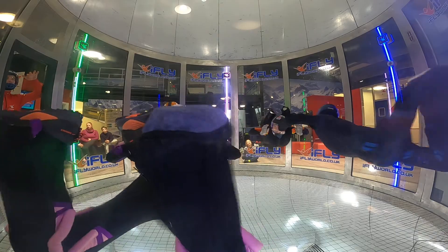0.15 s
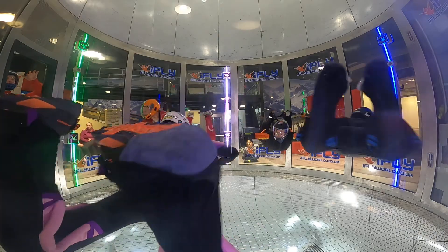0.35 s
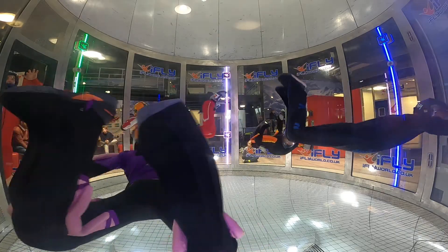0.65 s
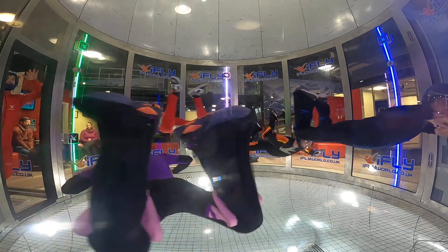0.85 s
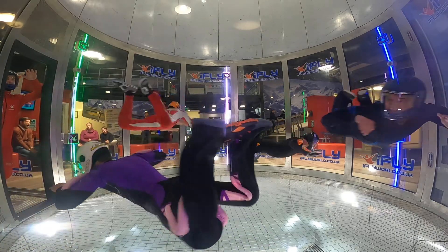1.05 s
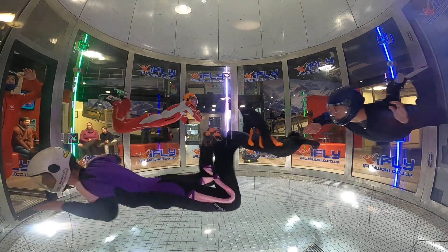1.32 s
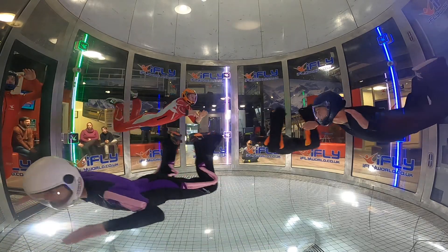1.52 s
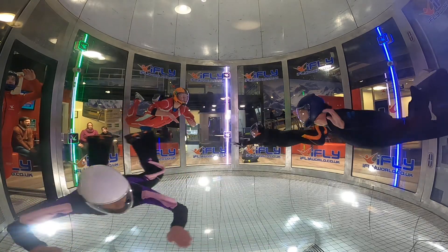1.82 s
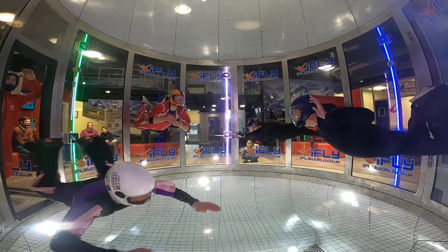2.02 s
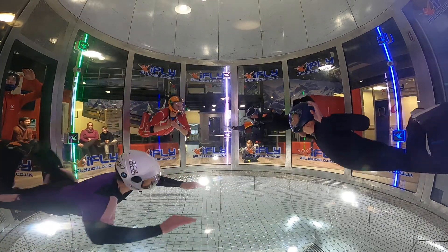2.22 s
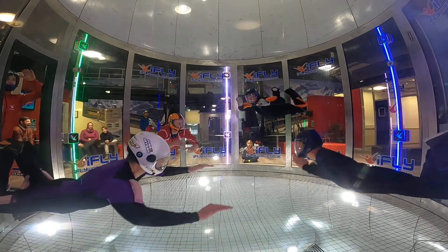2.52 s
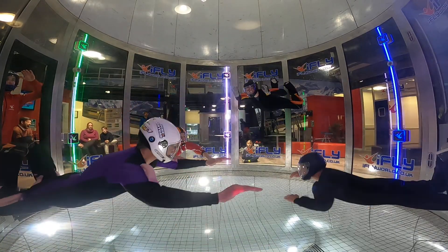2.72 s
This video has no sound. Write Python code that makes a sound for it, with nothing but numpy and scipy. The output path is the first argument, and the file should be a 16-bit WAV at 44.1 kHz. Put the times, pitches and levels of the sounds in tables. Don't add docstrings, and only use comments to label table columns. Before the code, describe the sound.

Steady rushing wind fills a round flight chamber from start to end, with bassy fan hum, unsteady low swells and hissy mesh whistle; near the end the fan tone briefly dips and returns, heard by a small onboard camera.

```python
import sys
import numpy as np
from scipy import signal
from scipy.fft import rfft, irfft, next_fast_len
from scipy.io import wavfile
from scipy.ndimage import uniform_filter1d, map_coordinates

SR = 44100
rng = np.random.default_rng(int(sys.argv[2]) if len(sys.argv) > 2 else 0)


def store_pcm(level_fs):
    pcm = np.round(np.clip(level_fs, -1, 1) * 32767).astype(np.int16)
    wavfile.write(sys.argv[1], SR, np.atleast_2d(pcm).T)


def ratio(d):
    e = np.asarray(d, float) / 20
    return 10 ** e


N = 126126

# (time [s], blade rate [Hz], level [dB])
FAN_TRACK = [(0, 38.3, -15.5), (.15, 38.24, -13), (.4, 38.32, -17.5), (.55, 38.19, -14.5), (.8, 39.02, -17),
             (.95, 38.71, -18.5), (1.1, 38.82, -14.5), (1.3, 38.23, -15.5), (1.8, 38.1, -16.5),
             (2, 38.11, -18), (2.3, 37.77, -15), (2.5, 37.67, -22), (2.72, 39, -34), (2.86, 38.53, -15)]
# (multiple [-], level re blade tone [dB])
FAN_ORDERS = [(3, -20.5), (6, -22), (9, -32.5), (12, -24.5)]
# (centre [Hz], width [Hz], level [dB])
CHAMBER_MODES = [(21, 15, 3.5), (64, 6.4, 4.5), (86, 8.8, 2.5), (114, 10, -8), (126.6, 12, 0.5),
                 (153.2, 19, 1.5), (188, 29, -3), (234.3, 20, -5), (253, 24, -4), (324, 34, -10)]
# (time [s], strength [dB])
STIR_TRACK = [
    (0, -20),
    (.5, -20.3),
    (1, -20),
    (1.6, -20.4),
    (2.2, -19.8),
    (2.42, -19.3),
    (2.55, -17.8),
    (2.68, -19),
    (2.86, -19.5),
]
# (frequency [Hz], density [dB per Hz])
ROAR_SPECTRUM = [(150, -21), (280, -1), (600, -2.5), (850, -6), (1500, -6.5), (2800, -6), (4200, -26.5),
                 (7000, -60)]
# (frequency [Hz], density [dB per Hz])
HISS_SPECTRUM = [(3000, -22.5), (4500, 1), (5500, -0.5), (6000, -7), (7500, -6), (8200, -11.5),
                 (10000, -19), (15500, -20.5)]
# (centre [Hz], width [Hz], level [dB])
VANE_MODES = [(943, 31, -0.5), (1037, 360, -2), (1111, 27, 5)]
# (shedding centre [Hz], width [Hz], level [dB])
MESH_MODES = [(3212, 360, -4.5), (3504, 303, -0.5), (3698, 160, -3)]
# (time [s], level [dB])
MESH_TRACK = [
    (0, -20.5),
    (1.9, -21.5),
    (2.86, -23),
]
# (frequency [Hz], left-right likeness [-])
PORT_LIKENESS = [(60, 1), (250, 0.99), (700, 0.98), (1000, .93), (1500, 0.6), (2200, 0.82), (3200, 0.43),
                 (6000, 0.22)]
# (frequency [Hz], left over right [dB])
PORT_BALANCE_DB = [(100, .35), (250, 1.2), (600, 4), (1000, 3.3), (2000, 1.5), (3200, 4.2), (4100, -1.5),
                   (6000, -3.5)]
# (frequency [Hz], left lead [rad])
PORT_LEAD_RAD = [(100, 0), (780, -0.35), (1200, -0.43), (1980, 0.11), (2840, -.6), (3200, -0.66), (4740, 2)]
# (frequency [Hz], density [dB per Hz])
PORT_WIND_SPECTRUM = [(10, 8), (60, 12.5), (120, -13), (300, -29.5)]
# (middle [s], length [s], frequency [Hz], peak [dB])
WAKE_SURGES = [(0.358, 0.55, 150, -28.5), (0.987, .25, 148, -22.5), (1.399, 0.24, 86, -26),
               (1.62, .09, 158, -21.5), (1.645, 0.72, 65.8, -20.5), (1.901, 0.38, 86, -30.5),
               (1.996, .12, 125.7, -22.5), (2.149, 0.33, 159.7, -23.5), (2.368, 0.44, 62.48, -20),
               (2.618, 0.36, 177.7, -23), (2.731, 0.46, 64, -33), (2.778, 0.089, 145, -14),
               (2.704, .25, 239.5, -27.5)]
# (frequency [Hz], gain [dB])
HOUSING_GAIN = [(5000, 0), (7500, -0.5), (9000, -9), (12000, -16), (15500, -23.5)]


def unit(x):
    return x / np.sqrt(np.mean(x ** 2) + 1e-20)


def along(points, hz):
    point_hz, value = np.transpose(points)
    return np.interp(np.log(hz + 1), np.log(point_hz + 1), value)


def curves(rows):
    time_s, *columns = np.transpose(rows)
    return [np.interp(np.arange(N) / SR, time_s, column) for column in columns]


def wobble(rate_hz):
    knots = rng.standard_normal(int(N * rate_hz / SR) + 4)
    return map_coordinates(knots, [np.arange(N) * rate_hz / SR])


def filtered(x, response):
    size = next_fast_len(N + 8192)
    spectrum = rfft(x, size) * response(np.fft.rfftfreq(size, 1 / SR))
    return irfft(spectrum, size)[..., :N]


def resonant(modes, steep):
    def gain(f):
        power = 0
        for centre_hz, width_hz, db in modes:
            bandpass = np.abs(f * width_hz / (centre_hz ** 2 - f * f + 1j * f * width_hz))
            power = power + ratio(2 * db) * bandpass ** (2 * steep)
        return np.sqrt(power)
    return gain


def shaped(points):
    return lambda f: ratio(along(points, f))


def ports(f):
    angle = np.arccos(np.clip(along(PORT_LIKENESS, f), -1, 1)) / 2
    side = np.array([[1], [-1]])
    level = ratio(side * along(PORT_BALANCE_DB, f) / 2)
    gain = level * np.exp(0.5j * side * along(PORT_LEAD_RAD, f))
    return gain * np.cos(angle), gain * side * np.sin(angle)


def at_ports(x):
    return filtered(x, lambda f: ports(f)[0])


def rush(colour, patchy_db):
    noise = signal.stft(rng.standard_normal((2, N + 512)), nperseg=512)[2]
    patches = rng.standard_normal(noise.shape[1:])
    patches = uniform_filter1d(uniform_filter1d(patches, 6, 0), 14, 1)
    patchy = noise * ratio(patchy_db * unit(patches))
    same, other = signal.istft(patchy, nperseg=512)[1][:, :N]
    shared = filtered(same, lambda f: colour(f) * ports(f)[0])
    differing = filtered(other, lambda f: colour(f) * ports(f)[1])
    return unit(shared + differing)


def port_buffet():
    lumps = ratio(3.5 * np.array([wobble(11), wobble(3.5)]))
    wind = filtered(rng.standard_normal((2, N)), shaped(PORT_WIND_SPECTRUM))
    return ratio(-39.5) * unit(lumps * wind)


def mesh_whistle():
    level_db, = curves(MESH_TRACK)
    whistle = rush(resonant(MESH_MODES, steep=1.64), patchy_db=0.3)
    return ratio(level_db + 2 + 0.45 * wobble(13)) * whistle


def wake_surges():
    t = np.arange(N) / SR
    flutter_db, drift_rad = 0.2, 0.76
    rings = np.zeros(N)
    for mid_s, length_s, hz, peak_db in WAKE_SURGES:
        swell = np.cos(np.pi * np.clip((t - mid_s) / length_s, -0.5, 0.5))
        level = ratio(peak_db + flutter_db * wobble(12))
        rings += level * swell * np.sin(2 * np.pi * hz * t + drift_rad * wobble(9))
    return at_ports(np.sqrt(2) * rings)


def fans():
    rate_hz, level_db = curves(FAN_TRACK)
    tone_flutter_db, order_flutter_db = -0.3, 4
    phase = 2 * np.pi * np.cumsum(rate_hz) / SR
    throb = ratio(level_db + tone_flutter_db * wobble(10.97)) * np.sin(phase - 1.3)
    for multiple, order_db in FAN_ORDERS:
        level = ratio(level_db.mean() + order_db + order_flutter_db * wobble(5))
        throb = throb + level * np.sin(multiple * phase + 1.5 * wobble(4))
    return at_ports(np.sqrt(2) * throb)


def airflow():
    stir_db, = curves(STIR_TRACK)
    mean_db = stir_db.mean()
    swing_db = stir_db - mean_db
    boom_db = 0.5 + 0.74 * swing_db
    flow_swing_db = 1.22 * swing_db
    roar_db = -3 + flow_swing_db + 0.35 * wobble(7)
    vanes_db = -28 + flow_swing_db + 0.27 * wobble(4.5)
    hiss_db = -42 + 0.3 * wobble(9)
    boom = ratio(boom_db) * rush(resonant(CHAMBER_MODES, steep=1.37), patchy_db=-0.32)
    roar = ratio(roar_db) * rush(shaped(ROAR_SPECTRUM), patchy_db=0.5)
    vanes = ratio(vanes_db) * rush(resonant(VANE_MODES, steep=1.2), patchy_db=-0.06)
    hiss = ratio(hiss_db) * rush(shaped(HISS_SPECTRUM), patchy_db=0.3)
    return ratio(mean_db) * (boom + roar) + vanes + hiss


def scene():
    return port_buffet() + mesh_whistle() + wake_surges() + fans() + airflow()


def band_limit(x):
    return signal.sosfilt(signal.butter(12, 15150, fs=SR, output="sos"), x)


def record(dry):
    ceiling, knee = 1.1, 3.5
    soft = dry / (1 + np.abs(dry / ceiling) ** knee) ** (1 / knee)
    mix = filtered(soft, shaped(HOUSING_GAIN))
    return band_limit(mix)


dry = scene()
out = record(dry)
store_pcm(out)
```